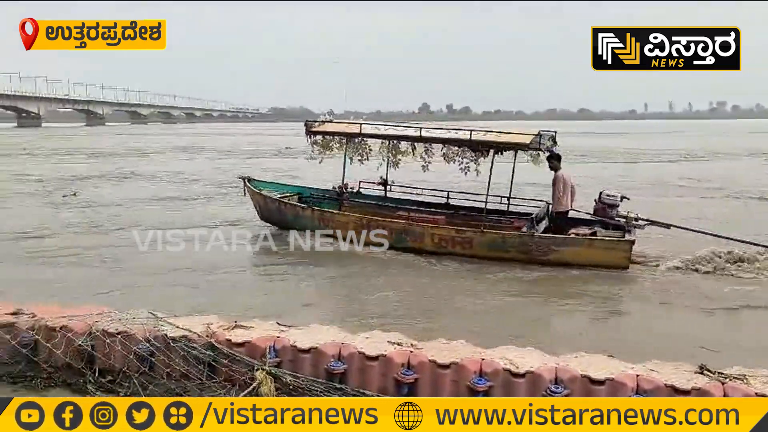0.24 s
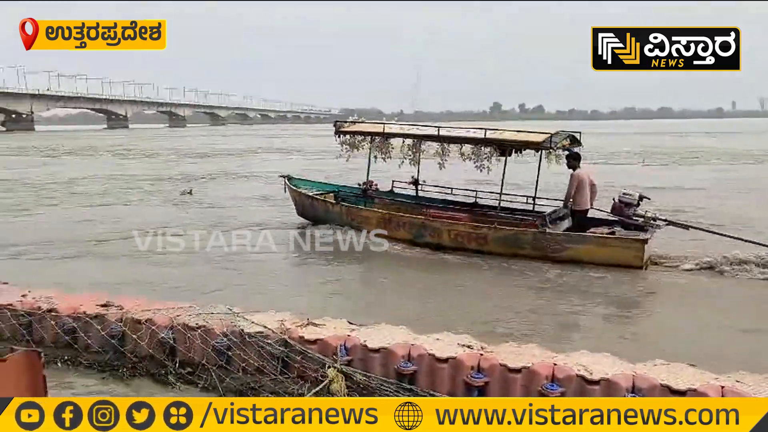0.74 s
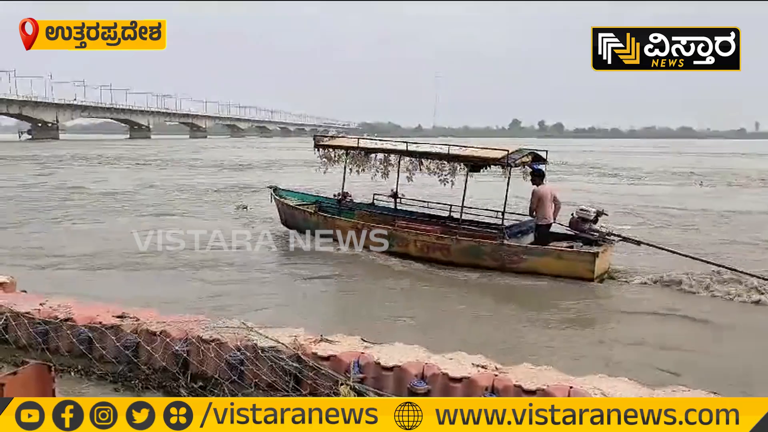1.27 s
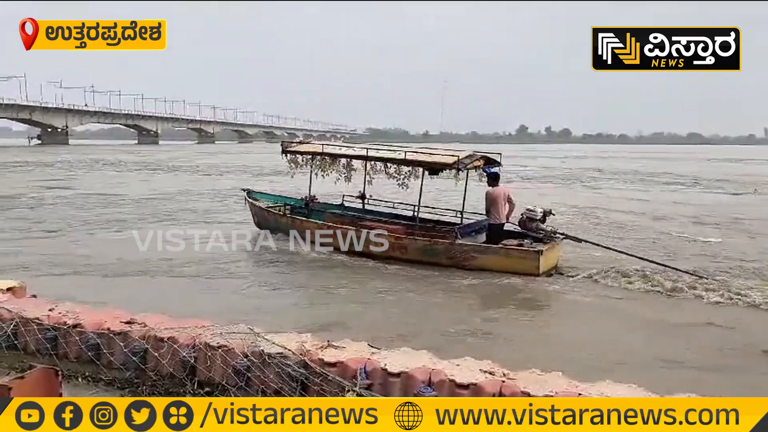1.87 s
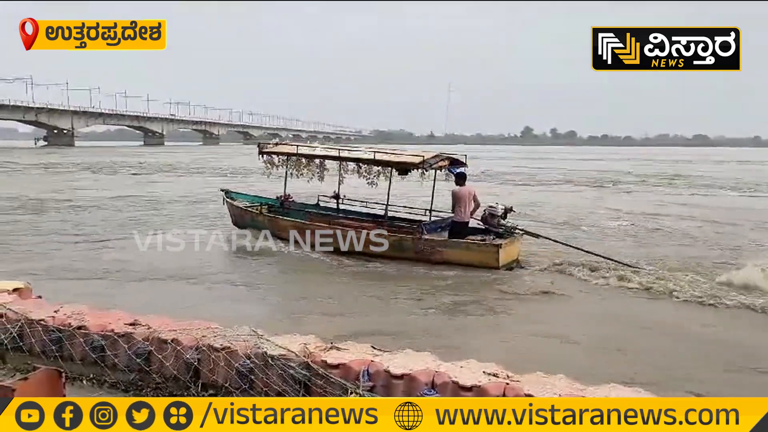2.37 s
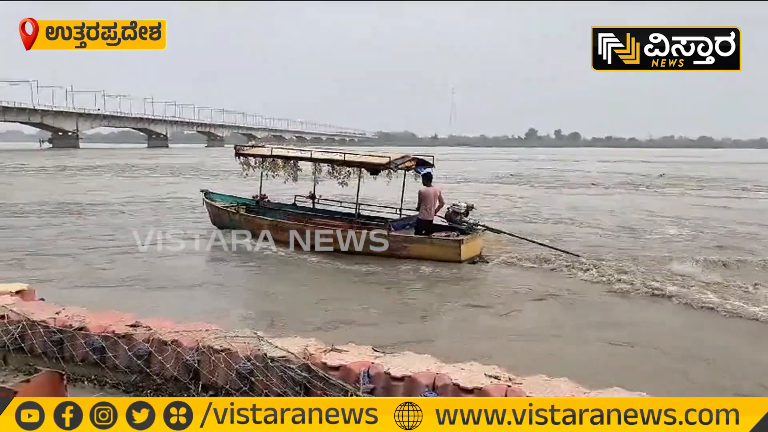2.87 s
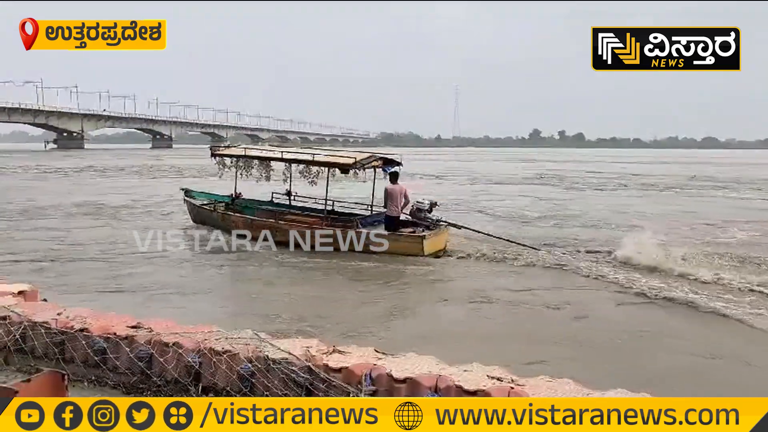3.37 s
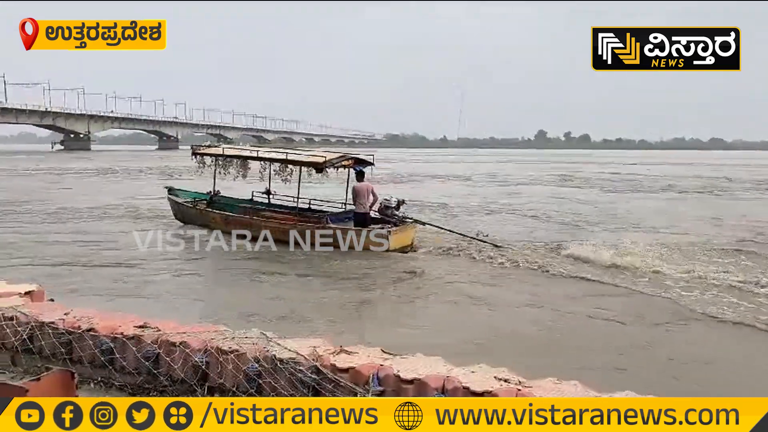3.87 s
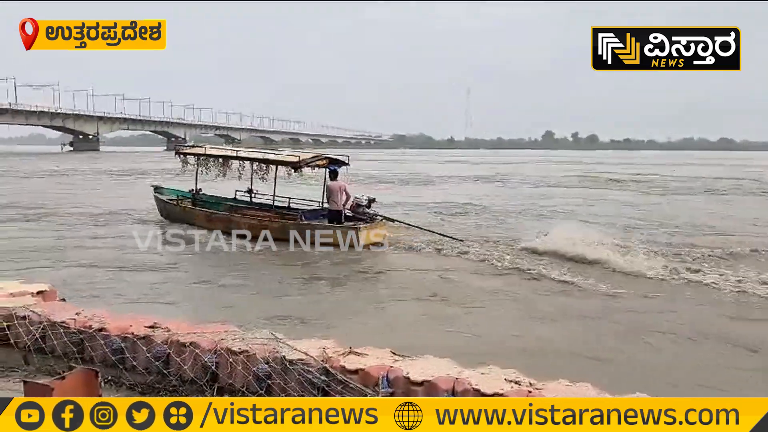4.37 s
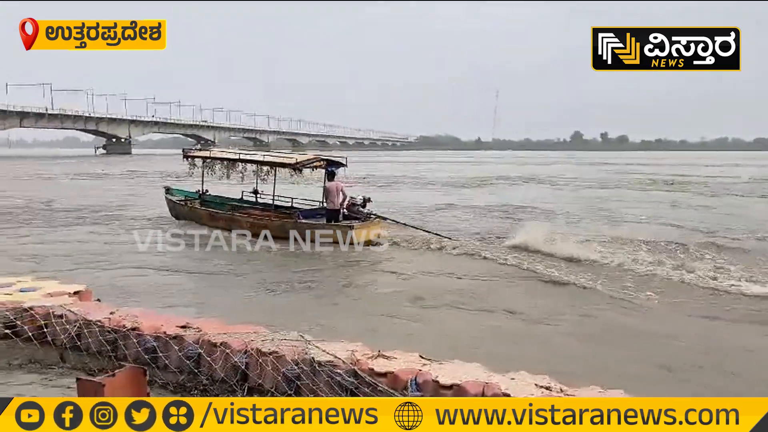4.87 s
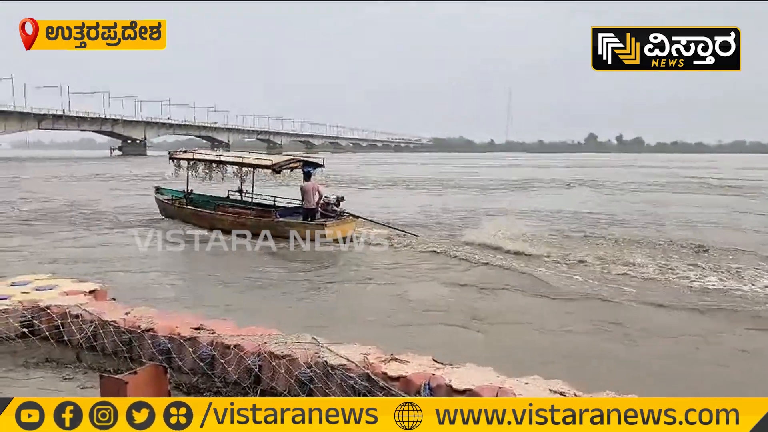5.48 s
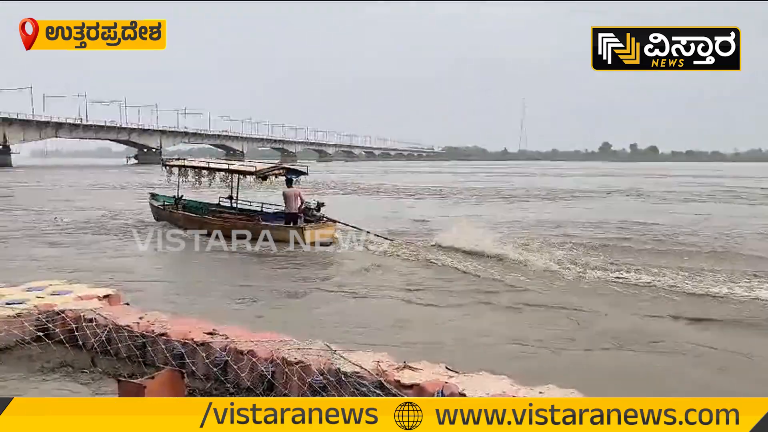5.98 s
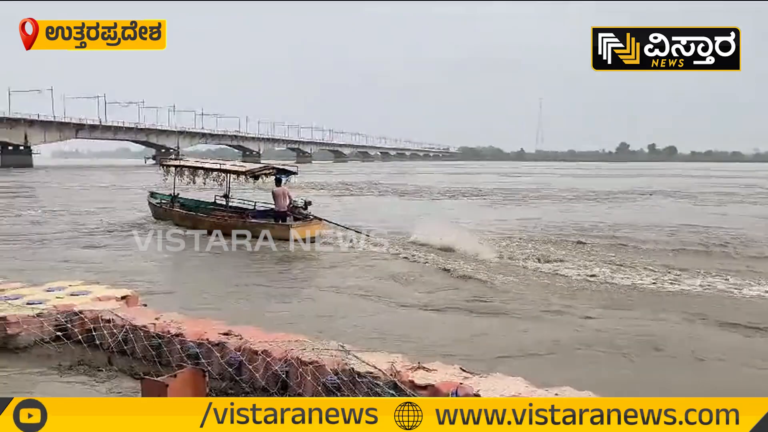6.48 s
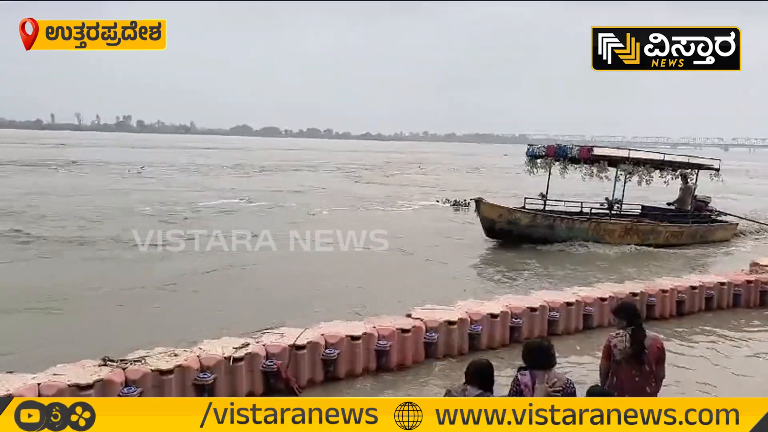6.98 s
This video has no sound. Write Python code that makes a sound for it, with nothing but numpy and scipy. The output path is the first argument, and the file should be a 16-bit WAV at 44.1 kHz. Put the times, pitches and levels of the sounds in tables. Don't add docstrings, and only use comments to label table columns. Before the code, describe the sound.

Outdoors on a river bank, a small wooden boat's single-cylinder engine hammers steadily, about thirty-three barks a second, with metal clatter, hissing spray and churning propeller wash. It moves from right towards centre as it recedes, revving slightly harder after two and a half seconds. Near the end there is a half-second of complete silence, then the engine resumes duller from the right. Two close-set microphones.

```python
import sys
import numpy as np
from scipy import signal
from scipy.fft import rfft, irfft, next_fast_len
from scipy.io import wavfile
from scipy.ndimage import uniform_filter1d, map_coordinates

SR = 44100
rng = np.random.default_rng(int(sys.argv[2]) if len(sys.argv) > 2 else 0)


def materialize(psi):
    bounded = np.clip(np.atleast_2d(psi).T, -1, 1)
    quanta = np.round(bounded * 32767).astype(np.int16)
    wavfile.write(sys.argv[1], SR, quanta)


def level_to_linear(level):
    exponent = np.asarray(level, float) / 20
    return 10 ** exponent


N = 318843

# from t/s, to t/s
SILENCE = (6.4126, 6.9283)
# t/s, engine effort level/dB, how far the bare block faces the bank level/dB
BOAT = [(0, 0, -4.5), (1.05, 0, -0.5), (1.25, -.5, 3), (1.6, -.5, 4), (2.15, 0.5, 4.5), (2.55, 2, 6.5),
        (2.75, 2, 2), (3.2, 2, 1), (4.0, 1, 3), (4.8, 0.5, -0.5), (5.4, 0, -1.5), (6.0, 0, 1),
        (6.41, -0.5, 6), (6.93, -1.5, -1)]


def unit(x):
    return x / np.sqrt(np.mean(x ** 2) + 1e-20)


def along(points, hz):
    f, v = np.transpose(points)
    return np.interp(np.log(hz + 1), np.log(f + 1), v)


def curves(rows):
    s, *cols = np.transpose(rows)
    return [np.interp(np.arange(N) / SR, s, c) for c in cols]


def wobble(rate):
    knots = rng.standard_normal(int(N * rate / SR) + 4)
    return map_coordinates(knots, [np.arange(N) * rate / SR])


def filtered(x, response):
    m = 2 * next_fast_len(N // 2 + SR // 4)
    return irfft(rfft(x, m) * response(np.fft.rfftfreq(m, 1 / SR)), m)[..., :N]


def modes(table):
    def response(f):
        total = 0
        for k, (centre, width, db) in enumerate(table):
            resonance = 1j * f * width / (centre * centre - f * f + 1j * f * width)
            total = total + (-1) ** k * level_to_linear(db) * resonance
        return total
    return response


def noise_pair(patchy_db):
    # f/Hz, left-right correlation
    likeness = [(60, .98), (300, .93), (700, .7), (1500, .72), (3000, .64), (6000, .52), (12000, .3)]
    z = signal.stft(rng.standard_normal((2, N)), nperseg=512)[2]
    field = rng.standard_normal(z.shape[1:])
    field = uniform_filter1d(uniform_filter1d(field, 5, 0), 12, 1)
    pair = signal.istft(z * level_to_linear(patchy_db * unit(field)), nperseg=512)[1][:, :N]

    def mix(hz):
        angle = np.arccos(np.clip(along(likeness, hz), -1, 1)) / 2
        return np.array([np.cos(angle), np.sin(angle)])

    mid, side = filtered(pair, mix)
    return np.array([mid + side, mid - side])


def after_change():
    return np.arange(N) / SR > np.mean(SILENCE)


def level(db, loss, effort, facing, side_db):
    start_m, speed_m_per_s, farthest_m = 15.05, 3.18, 28.6
    effort_db, facing_db = curves(BOAT)
    distance_m = np.minimum(start_m + speed_m_per_s * np.arange(N) / SR, farthest_m)
    loss_db = -20 * np.log10(distance_m / start_m)
    moving_db = db + loss * loss_db + effort * effort_db + facing * facing_db
    return level_to_linear(np.where(after_change(), side_db, moving_db))


def by_heading(x, responses):
    # t/s, heading (0 to 3)
    turning = [
        (1.8, 0),
        (3.1, 1),
        (5, 2),
        (6.41, 2.2),
        (6.92, 3),
    ]
    heading = curves(turning)[0]
    shape = (len(responses),) + (1,) * (x.ndim - 1) + (-1,)
    views = filtered(x, lambda hz: np.array([r(hz) for r in responses]).reshape(shape))
    return sum(np.clip(1 - abs(heading - k), 0, 1) * unit(v) for k, v in enumerate(views))


def crank():
    # t/s, firing rate f/Hz
    speed = [(0, 32.81), (.7, 32.745), (1.75, 32.745), (2.0, 32.53), (2.25, 32.737), (2.4, 32.737),
             (2.5, 33.42), (3.0, 34.1), (3.5, 34.53), (4.0, 34.4), (5.0, 34.4), (6.41, 34.37),
             (6.93, 32.92)]
    first_turn, slip = -.43, .148
    return first_turn + np.cumsum(curves(speed)[0]) / SR + slip * after_change()


def pulses(turn, lead, scatter_db, jitter_ms):
    cycle = np.arange(-1, int(turn[-1]) + 1)
    luck = rng.standard_normal((len(cycle), 2))
    at = np.interp(cycle - lead, turn, np.arange(N)) + luck[:, 0] * jitter_ms * SR / 1000
    at = np.clip(at, 1, N - 2)
    size = level_to_linear(scatter_db * luck[:, 1]) * (at > 1) * (at < N - 2)
    whole = at.astype(int)
    return np.bincount(whole, size * (1 + whole - at), N) + np.bincount(whole + 1, size * (at - whole), N)


def puffs(turn, lead, decay, second, scatter_db):
    size = level_to_linear(scatter_db * rng.standard_normal((int(turn[-1]) + 4, 2)))

    def burst(at, k):
        phase = at % 1
        return size[at.astype(int), k] * np.exp(-phase / decay) * (1 - np.exp(-phase / 0.032))

    return unit(burst(turn + lead + 1, 0) + second * burst(turn + lead + 1.48, 1))


def wash():
    # f/Hz, spectral density level/dB
    churn_colour = [(15, -39), (30, -5.5), (64, -6.5), (140, 4), (230, -8), (400, -5), (1400, -12.5),
                    (15700, -32)]
    # t/s, f/Hz, level/dB, life/s, half the relative rise
    soft_tones = [
        (-.15, 557, -23, 0.56, 0.0077),
        (.63, 503, -22.5, .08, .12),
        (4.57, 647, -30, 0.038, 0.11),
        (6.26, 500, -24.5, .13, .2),
    ]
    swell_db = .5 * wobble(1.0) + 0.4 * wobble(15)
    churn = unit(filtered(noise_pair(patchy_db=1.0), lambda hz: level_to_linear(along(churn_colour, hz))))
    water = level(-21, loss=.55, effort=.36, facing=.13, side_db=-23.5) * level_to_linear(swell_db) * churn
    for s, hz, db, life, rise in soft_tones:
        u = np.clip((np.arange(N) / SR - s) / life, 0, 1)
        water = water + level_to_linear(db) * np.sin(np.pi * u) * np.sin(2 * np.pi * hz * life * u * (1 + rise * u))
    return water


def clatter(turn):
    # f/Hz, width/Hz, level/dB
    block_modes = [
        [(1266, 110, 2), (1641, 59, 1.5), (1840, 240, -1), (2260, 290, 6), (2985, 1000, -3)],
        [(1290, 59, 0.5), (1670, 50, 0.5), (2010, 200, -6.5), (2380, 420, -4), (2830, 1100, -10.5)],
        [(1135, 75, -4), (1590, 110, -1), (1880, 79, 0.5), (2223, 89, 2), (2550, 1300, -12)],
        [(1290, 150, -13), (1860, 69, 0.5), (1900, 270, -1.5), (2430, 130, 2.5), (3360, 400, -11)],
    ]
    # f/Hz, width/Hz, level/dB
    fin_modes = [
        [(3600, 320, 1.5), (4700, 600, 3), (5500, 1100, 1.5), (7040, 900, 0)],
        [(3550, 740, -4), (4790, 660, 1), (5480, 700, 0.5), (6670, 800, -3.5)],
        [(3600, 890, -4.5), (4720, 580, 1.5), (5250, 770, 0), (6800, 600, -9)],
        [(3740, 473, 1), (4570, 940, -3), (5240, 575, -0.5), (6900, 660, -3.5)],
    ]
    # f/Hz, spectral density level/dB
    spray_colours = [
        [(6000, -31.5), (7300, -12), (9000, -11), (10300, -5), (11800, 2), (13500, -2), (16000, -3.5)],
        [(6000, -36.5), (7300, -6.5), (9000, -5.5), (10300, -3), (11800, -7.5), (13500, -7), (16000, -6)],
        [(6000, -32.5), (7300, 1.5), (9000, 1.5), (10300, 0), (11800, -3), (13500, -2), (16000, -4.5)],
        [(6000, -39.5), (7300, -4), (9000, -8), (10300, -12.5), (11800, -2), (13500, -3), (16000, -10)],
    ]
    growth = .05 * curves(BOAT)[1] + .045 * np.arange(N) / SR
    bite = np.clip(.62 + np.where(after_change(), 0, growth), 0, 1)
    kick = puffs(turn, lead=.36, decay=.16, second=.26, scatter_db=1.6)

    def gate(depth):
        steady = np.sqrt(np.clip(1 - (depth * bite) ** 2, 0, 1))
        return steady + depth * bite * kick

    taps = .9 * pulses(turn, lead=.33, scatter_db=1.8, jitter_ms=.06)
    taps = taps + 1.1 * pulses(turn, lead=.105, scatter_db=1.2, jitter_ms=.025)
    taps = taps + .55 * pulses(turn, lead=-.09, scatter_db=2, jitter_ms=.05)
    struck = noise_pair(patchy_db=2.1) * gate(.74) + .95 * unit(taps)
    knock = by_heading(struck, [modes(m) for m in block_modes])

    shaken = noise_pair(patchy_db=2.5) * gate(1.05)
    shaken = shaken + .41 * unit(pulses(turn, lead=.36, scatter_db=2, jitter_ms=.3))
    rattle = by_heading(shaken, [lambda hz, m=m: modes(m)(hz) ** 2 for m in fin_modes])

    drops = noise_pair(patchy_db=3.0) * gate(.68)
    spray = by_heading(drops, [lambda hz, m=m: level_to_linear(along(m, hz)) for m in spray_colours])
    metal = level(-21, loss=.72, effort=.99, facing=.4, side_db=-26) * knock
    metal = metal + level(-30.5, loss=-.09, effort=.06, facing=1.02, side_db=-39.5) * rattle
    return metal + level(-30, loss=.83, effort=.01, facing=.68, side_db=-44.5) * spray


def pipe(orders, rate, spread, low, high):
    def response(hz):
        order = hz / rate
        lobe = .2 * ((order > 3.5) & (order < 8.5))
        null = .3 * ((abs(order - 4) < .5) | (abs(order - 8) < .5))
        chirp = -spread * (np.clip(order, 8.5, 15.5) - 10.5) ** 2 * (order > 8.5) * (order < 15.5)
        chirp -= .3 * spread * (order - 22) ** 2 * (order >= 15.5)
        outline = [(.2, -66)] + list(orders) + [(33, -19), (45, -80.5)]
        phase = np.exp(-2j * np.pi * (lobe + null + chirp))
        return level_to_linear(along(outline, order)) * phase * (order >= low) * (order < high)
    return response


def exhaust(turn):
    pipe_levels = [
        [-19.5, -2.5, -6.5, -10.5, -5.5, -5.5, -9, -16.5, -11.5, -6.5, -5.5, -10, -8, -8, -11],
        [-14, -2, -10.5, -8.5, -2, -7.5, 0, -13, -13.5, -1.5, -1, -1, -1, -7, -5],
        [-18.5, -9, -9, -4.5, 3.5, 4.5, 5.5, -29, -4, 4, 5, -2, -1.5, -27, -3.5],
        [-12, 4.5, 0, -13, -36, -2, -7.5, -7, -2, -35, -11.5, -17, -10.5, -23, -18],
    ]
    # multiple of the firing rate, level/dB
    front_levels = [
        [(16, -5), (19, -29), (22, -1), (23, -20), (25, -3.5), (28, -12), (30, -8)],
        [(16, -23.5), (19, -14.5), (21, -27.5), (22, -19.5), (25, -9.5), (27, -26), (28, -16.5)],
        [(16, -10), (18, -23.5), (20, -31), (21, -10.5), (23, -11.5), (25, -10.5), (29, -35)],
        [(16, -10), (18, -10), (19, -6.5), (22, -6.5), (24, -10.5), (27, -35), (29, -21.5)],
    ]
    firing_rates = [32.7, 34.4, 34.4, 32.9]
    smear = [.012, .006, .015, .055]
    # f/Hz, width/Hz, level/dB
    muzzle = [(599, 74, 8), (756, 42, -0.5), (835, 230, -1), (970, 150, -5.5)]

    def part(x, low, high):
        views = []
        for levels, front_part, rate, spread in zip(pipe_levels, front_levels, firing_rates, smear):
            orders = list(enumerate(levels, start=1)) + front_part
            views.append(pipe(orders, rate, spread, low, high))
        return by_heading(x, views)

    beats = pulses(turn, lead=-.02, scatter_db=.5, jitter_ms=.03)
    front = pulses(turn, lead=.025, scatter_db=.8, jitter_ms=.03)
    thump = part(beats, 0, 3.5)
    bark = part(beats, 3.5, 15.5)
    crack = part(front, 15.5, 60)
    bank = np.array([np.roll(crack, round(ms * SR / 1000)) for ms in (6.3, 9.1)])
    jet = noise_pair(patchy_db=1.5)
    jet = jet * (.6 + .4 * puffs(turn, lead=.1, decay=.2, second=.7, scatter_db=2.2))
    gas = unit(filtered(jet, modes(muzzle)))
    low = level(-16.5, loss=1.26, effort=.5, facing=-.07, side_db=-19) * thump
    low = low + level(-20.5, loss=-.13, effort=1.38, facing=-.11, side_db=-23) * bark
    sharp = crack + .62 * bank + level_to_linear(-12) * gas
    return low + level(-22, loss=1.35, effort=-1, facing=.2, side_db=-27) * sharp


def scene():
    # t/s, delay/ms
    bearing = [
        (0, .21),
        (1, .2),
        (2, 0.14),
        (3.5, .045),
        (6.4, -0.054),
        (6.93, 0.24),
        (7.23, .21),
    ]
    turn = crank()
    boat = exhaust(turn) + clatter(turn) + wash()
    lag = curves(bearing)[0] * SR / 2000
    return np.array([map_coordinates(c, [np.arange(N) - s * lag], order=3, mode="nearest")
                     for c, s in zip(boat, (1, -1))])


def low_pass(x):
    return signal.sosfilt(signal.butter(12, 15870, fs=SR, output="sos"), x)


def record(dry):
    # f/Hz, left minus right level/dB
    mismatch = [(60, .5), (380, .5), (700, 0), (1290, -3), (2380, -2), (8120, 0), (15000, -1.5)]
    x = dry / (1 + np.abs(dry / 1.1) ** 6) ** (1 / 6)
    x = filtered(x, lambda hz: level_to_linear(np.array([[.5], [-.5]]) * along(mismatch, hz)) * (hz < 15850))
    t = np.arange(N) / SR
    mix = x * ((t < SILENCE[0]) | (t > SILENCE[1]))
    return low_pass(mix)


dry = scene()
out = record(dry)
materialize(out)
```